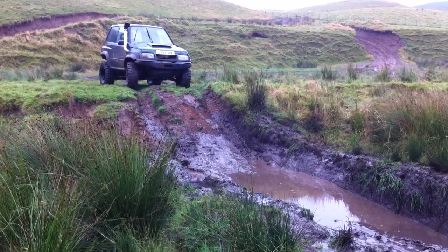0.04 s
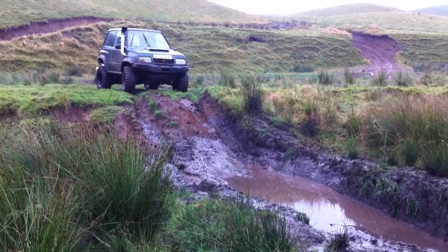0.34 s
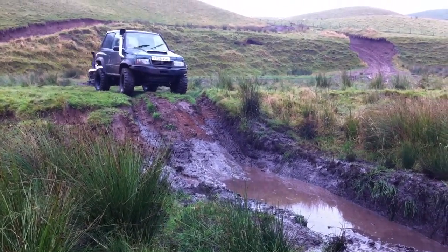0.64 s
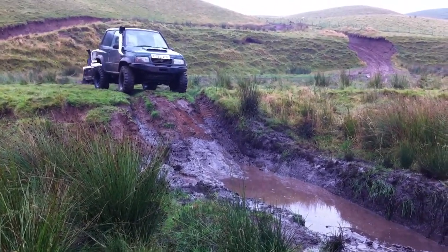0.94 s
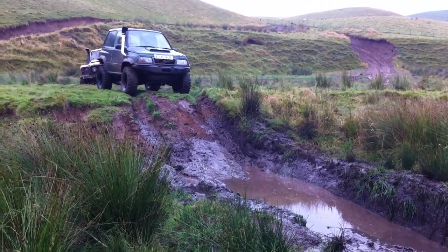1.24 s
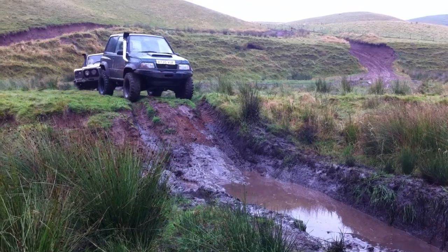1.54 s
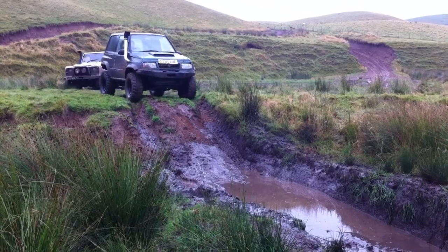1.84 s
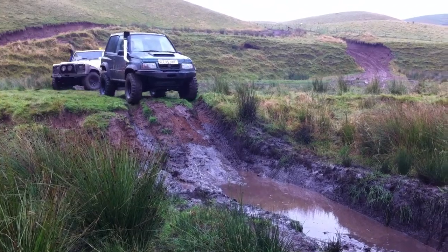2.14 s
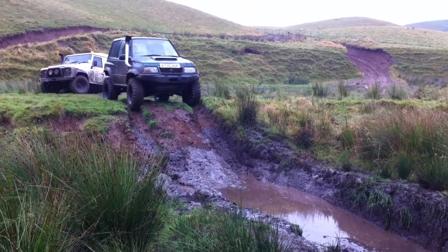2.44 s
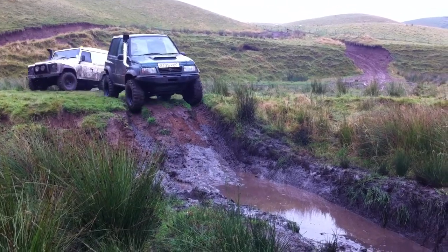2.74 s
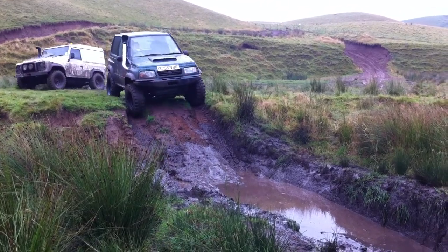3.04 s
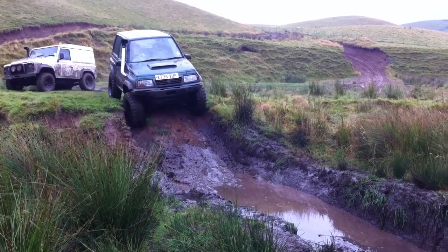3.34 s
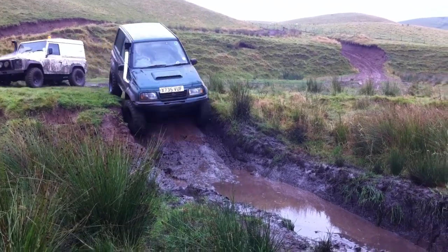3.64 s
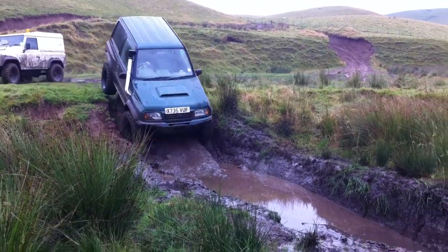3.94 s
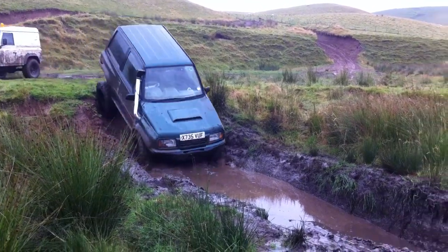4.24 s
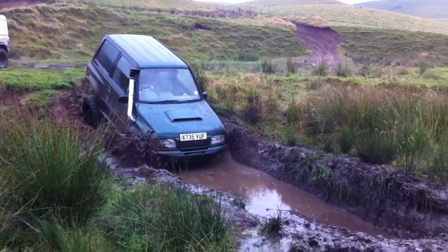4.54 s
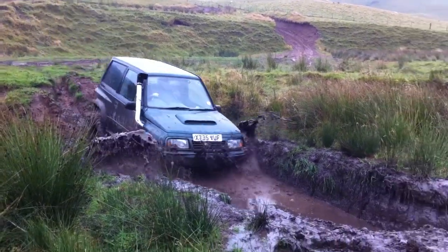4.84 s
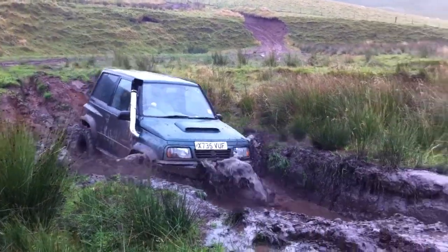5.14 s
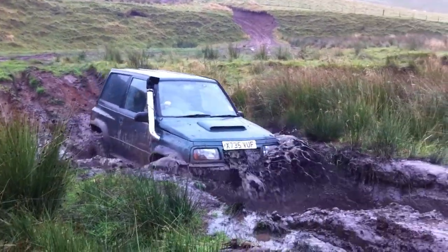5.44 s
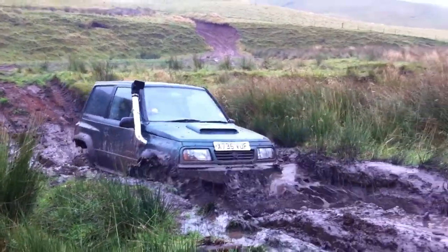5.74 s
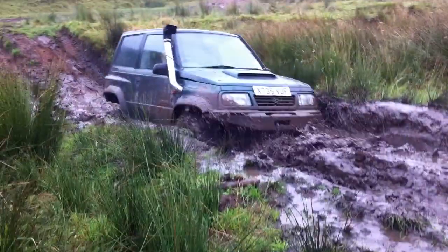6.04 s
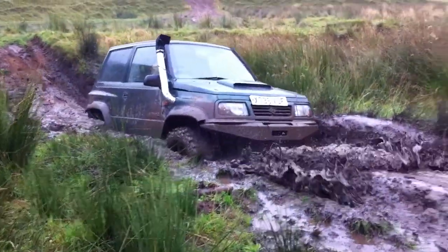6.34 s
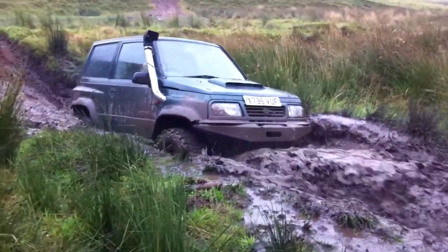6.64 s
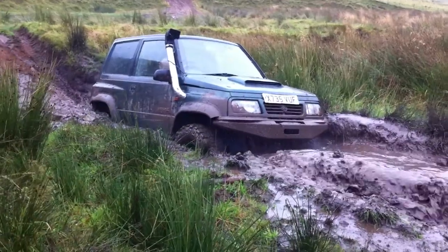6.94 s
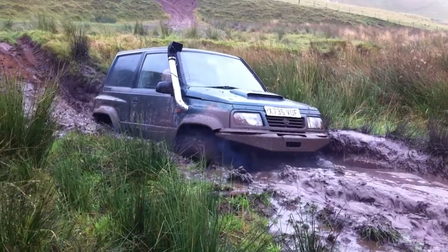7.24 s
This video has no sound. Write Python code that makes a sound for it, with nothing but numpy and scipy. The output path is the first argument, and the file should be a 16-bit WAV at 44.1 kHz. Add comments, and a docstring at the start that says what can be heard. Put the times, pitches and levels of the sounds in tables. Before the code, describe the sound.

On open grassland, a diesel idles close by while an off-road vehicle creeps forward with three light revs, a thin turbo whistle and faint metal clanks. About halfway through, it knocks its underside and drops into a flooded hole. Mud sloshes, gurgles and sprays as the engine surges under load, ending in a loud full-throttle roar. The sound is dry, without echo.

```python
"""A 4x4 through a mud hole

A turbo-diesel creeps over a bank on three dabs of the pedal, drops into a flooded hole, ploughs through and
roars at full throttle, louder with speed, load and nearness. Its firings excite the exhaust, the turbo's blade
tone slides through the intake's resonances, and the wheels churn mud and throw spray. A second diesel idles
close by all along, on open grassland."""
import sys
import numpy as np
from scipy import signal
from scipy.fft import rfft, irfft
from scipy.io import wavfile
from scipy.ndimage import uniform_filter1d, map_coordinates

SR = 44100
rng = np.random.default_rng(int(sys.argv[2]) if len(sys.argv) > 2 else 0)


def wav_record(signal):
    """Record a signal, one row per channel, as 16-bit PCM in the file named by sys.argv[1]."""
    frames = np.transpose(np.atleast_2d(signal))
    bounded = np.clip(frames, -1, 1)
    # unit amplitude maps onto the largest positive 16-bit level
    quanta = np.round(bounded * 32767).astype(np.int16)
    wavfile.write(sys.argv[1], SR, quanta)


N = 331191
TOP_HZ = 15900  # upper band limit


def undb(db):
    """Decibels to amplitude ratio."""
    return 10 ** (np.asarray(db) / 20)


def unit(x):
    """Normalisation to rms 1."""
    return x / np.sqrt(np.mean(x ** 2))


def curves(table):
    """Linear interpolation of each column in time."""
    s, *columns = np.transpose(table)
    return [np.interp(np.arange(N) / SR, s, c) for c in columns]


def ramp(start_s, length_s):
    """A linear rise from 0 to 1, then held."""
    return np.clip((np.arange(N) / SR - start_s) / length_s, 0, 1)


def burst(start_s, attack_s, decay_s):
    """An impact's envelope: quick rise, exponential decay."""
    age = np.maximum(np.arange(N) / SR - start_s, 0)
    return (1 - np.exp(-age / attack_s)) * np.exp(-np.minimum(age / decay_s, 20))


def noise():
    """White Gaussian noise."""
    return rng.standard_normal(N)


def walk(rate_hz):
    """Random modulation: chance levels joined by straight lines; rms 1."""
    hold = int(SR / rate_hz)
    steps = np.repeat(rng.standard_normal(N // hold + 1), hold)
    return unit(uniform_filter1d(steps, hold)[:N])


def colour(x, response, sharp=1, size=8192):
    """Filtering by a body's response; sharp 1 is minimum phase (sudden onset), 0 zero phase; rms 1."""
    hz, db = np.transpose(response)
    log_hz = np.log(np.maximum(np.fft.rfftfreq(size, 1 / SR), 1))
    beyond = np.abs(log_hz - np.clip(log_hz, np.log(hz[0]), np.log(hz[-1])))
    gain = undb(np.interp(log_hz, np.log(hz), db) - 20 * beyond)
    cepstrum = irfft(np.log(gain)) * (1 + sharp * np.sign(np.fft.fftfreq(size)))
    impulse_response = np.roll(irfft(np.exp(rfft(cepstrum))), size // 2)
    return unit(signal.fftconvolve(x, impulse_response, "same"))


def resonate(x, modes):
    """Modal superposition: x drives parallel resonators."""
    return sum(undb(db) * signal.lfilter(*signal.iirpeak(hz, hz / width, fs=SR), x)
               for hz, width, db in modes)


def bend(x, ratio):
    """Time warping scales every frequency by a changing ratio."""
    return map_coordinates(x, [np.cumsum(ratio)], mode="mirror")


def firings(phase, cylinder_db, scatter_db, jitter_s, limp_s=0):
    """A pulse train: cylinders differ in strength, and every second one fires limp_s late."""
    k = np.arange(1, int(phase[-1]))
    chance = rng.standard_normal((len(k), 2))
    s = np.interp(k, phase, np.arange(N) / SR) + limp_s * (k % 2) + jitter_s * chance[:, 0]
    size = undb(np.array(cylinder_db)[k % len(cylinder_db)] + scatter_db * chance[:, 1])
    return np.bincount(np.clip(s * SR, 0, N - 1).astype(int), size, N)


def grains(per_s, spread_db, decay_s):
    """Shot noise: short bursts of random time and size add in power."""
    when, chance = rng.random((int(per_s * N / SR), 2)).T
    size = undb(-spread_db * np.log(np.maximum(chance, .004)))
    impacts = np.bincount((when * N).astype(int), size ** 2, N)
    power = signal.lfilter([1], [1, -np.exp(-1 / (decay_s * SR))], impacts)
    return unit(np.sqrt(power) * noise())


def rings(per_s, low_hz, high_hz, cycles, spread_db, glide=0):
    """Damped oscillations at random times, each rising in pitch by the fraction glide."""
    out = np.zeros(N + SR)
    for when, pitch, size in rng.random((int(per_s * N / SR), 3)):
        hz = low_hz * (high_hz / low_hz) ** pitch
        age = np.linspace(0, 1, int(cycles * SR / hz))
        tone = np.sin(2 * np.pi * cycles * age * (1 + glide * age / 2))
        envelope = np.sqrt(age) * np.exp(-np.log(300) * age)
        out[int(when * N):][:len(age)] += tone * envelope * undb(spread_db * size ** 2)
    return unit(out[:N])


# dabs of the pedal on the bank: deepest_s, half_length_s, depth (0-1)
PEDAL_DABS = [(0.191, 0.4, 0.93), (0.851, 0.49, 0.99), (2.5, .55, .5)]


def pedal(lag_s=0):
    """A trapezoidal envelope: each dab is pressed, held briefly and lifted evenly."""
    t = np.arange(N) / SR - lag_s
    held_share = .2
    return np.max([depth * np.clip((1 - np.abs(t - s) / half_s) / (1 - held_share), 0, 1)
                   for s, half_s, depth in PEDAL_DABS], axis=0)


# modes of block, manifold and bonnet: pitch_hz, width_hz, gain_db
METAL_MODES = [(736, 130, -6), (1420, 78, -12), (2750, 97, 1), (4030, 92, 7)]


def panels(x):
    """Forced vibration: the metal adds its own modes to what drives it; rms 1."""
    return unit(x + resonate(x, METAL_MODES))


# crankshaft speed of the waiting diesel: time_s, turns_hz
IDLE_SPEED = [(0, 19.3), (.6, 17.1), (1.4, 17.3), (2.8, 17.55), (4.3, 17.5)]
# spectra of the idling exhaust and of both engines' knock: frequency_hz, gain_db
IDLE_EXHAUST = [(35, -54), (70, -20.5), (90, -2.5), (122, -17), (145, 5.5), (175, 5.5), (205, -6.5),
                (245, 2), (285, -26.5), (380, -19.5), (460, -47), (900, -46)]
KNOCK_SPECTRUM = [(300, -26.5), (480, -5), (620, 4), (800, 1), (950, -4.5), (1600, -10.5), (2700, -18.5),
                  (3200, -25), (5000, -17.5), (9000, -23.5)]


def idling_diesel():
    """Impulse excitation: thuds, rattle and steady knock, joined by the 4x4's knock at each dab."""
    turns_hz, = curves(IDLE_SPEED)
    phase = np.cumsum(2 * turns_hz) / SR + .688  # two firings a turn
    pulses = firings(phase, cylinder_db=[.031, -.099, .86, -.7], scatter_db=1.2,
                     jitter_s=.00016, limp_s=.0011)
    turbulence = undb(-8) * noise()
    exhaust = colour(unit(pulses) + turbulence, IDLE_EXHAUST, sharp=.3)
    pulsation = 1 + .071 * np.exp(-(phase % 1) / .19)
    knock = panels(colour(pulsation * noise(), KNOCK_SPECTRUM))
    knock_db = -47 + 3.5 * pedal()  # the rise is the 4x4's share
    rattle = rings(per_s=260, low_hz=1900, high_hz=2950, cycles=20, spread_db=7)
    return undb(-30.5) * exhaust + undb(knock_db) * knock + undb(-55.5 + 2 * walk(26)) * rattle


# modes of a loose plate and of the underside: pitch_hz, width_hz, gain_db
PLATE_MODES = [(2250, 90, -2), (2340, 160, 3)]
UNDERSIDE_MODES = [(724, 60, 2), (853, 25, -3), (1360, 120, -14)]
# clanks of the plate: start_s, level_db
PLATE_CLANKS = [(.740, -34.5), (.893, -36), (2.565, -42), (2.949, -39), (3.594, -39), (3.756, -38)]


def chassis():
    """Impacts excite modes: a loose plate chatters, and the underside knocks once on the slope."""
    chatter = sum(undb(db) * burst(s, attack_s=.0029, decay_s=.012) for s, db in PLATE_CLANKS)
    bump = undb(-21) * burst(start_s=4.212, attack_s=.0071, decay_s=.015)
    plate = unit(resonate(noise(), PLATE_MODES))
    underside = unit(resonate(noise(), UNDERSIDE_MODES))
    return chatter * plate + bump * underside


# slaps of mud and spatter, and two low engine thuds: start_s, relative_db, band_hz, decay_s
SLAPS_AND_THUDS = [(3.863, -45, 7000, .009), (4.105, -37, 7500, .002), (4.279, -35, 5000, .004),
                   (4.294, -28.5, 7500, .005), (4.332, -29, 1700, .018), (4.397, -27, 800, .013),
                   (4.628, -30.5, 1400, .03), (4.724, -29.5, 1700, .03), (5.94, -19, 190, .018),
                   (6.338, -22.5, 230, .022), (6.622, -27, 902, .02)]


def slaps_and_thuds():
    """Damped transients of band-limited noise: mud and spatter land; the labouring engine thuds twice."""
    out = np.zeros(N)
    for s, db, hz, decay_s in SLAPS_AND_THUDS:
        band = signal.butter(2, [hz / 1.62, min(hz * 1.2, TOP_HZ)], "bandpass", fs=SR, output="sos")
        hiss = noise()
        transient = signal.sosfilt(band, burst(s, .0011, decay_s) * hiss)
        out += undb(db + 4) * transient / np.std(signal.sosfilt(band, hiss))
    return out


# hiss of tread on wet grass: frequency_hz, gain_db
TYRE_SPECTRUM = [(1500, 13.5), (4000, 3.5), (7000, -4.5), (10500, -3.5), (15500, -12)]


def tyres():
    """Shot noise of the tread: the hiss grows with each dab and on rolling onto the wet slope."""
    level_db = -54 + 5.5 * pedal() + 8.5 * ramp(start_s=1.3, length_s=2.96)
    return undb(level_db) * colour(grains(per_s=2500, spread_db=4, decay_s=.004), TYRE_SPECTRUM)


# churning as the wheels sink in: time_s, level_db
CHURN_LEVEL = [(3.83, -43), (4.02, -40.5), (4.32, -33.5), (4.4, -29), (6.0, -27), (7.5, -28.5)]
# waves thrown up by the wheels: start_s, length_s, mud_gain_db, spray_gain_db
WAVES = [(3.842, 0.08, 0, 5.5), (4.337, 0.065, 0, 4), (5.089, 0.62, 0, 3), (6.567, 0.19, 2.5, 3),
         (7.086, 0.49, 3, 5)]
# spectra of mud and spray: frequency_hz, gain_db
MUD_SPECTRUM = [(60, -35), (200, 9), (370, 1.5), (450, -10.5), (600, 2.5), (780, 3.5), (1200, -5),
                (1550, -3), (2400, -10), (4000, -15), (9000, -21)]
SPRAY_SPECTRUM = [(900, -10.5), (2500, 3.5), (4500, 2.5), (7000, -1), (11500, -1), (15500, -9)]


def mud_and_spray():
    """Cavity resonance: air trapped in churned mud rings, while spray hisses; both swell with waves."""
    attack_s, release_s = .017, .12
    mud_db, = curves(CHURN_LEVEL)
    spray_db = mud_db - 7
    for s, length_s, mud_gain_db, spray_gain_db in WAVES:
        wave = ramp(s, attack_s) * (1 - ramp(s + length_s, release_s))
        mud_db += mud_gain_db * wave
        spray_db += spray_gain_db * wave
    surge = walk(25)
    hollows = 1 + .05 * walk(9)  # they open and close, so their pitch wanders
    slosh = bend(colour(grains(per_s=770, spread_db=.5, decay_s=.013), MUD_SPECTRUM), hollows)
    gulps = rings(per_s=140, low_hz=170, high_hz=950, cycles=10, spread_db=6, glide=.15)
    bubbles = rings(per_s=380, low_hz=753, high_hz=2623, cycles=23.5, spread_db=5, glide=.18)
    mud = undb(.54) * slosh + undb(-10) * gulps + undb(-7.5) * bubbles
    spray = colour(grains(per_s=5400, spread_db=-.5, decay_s=.0011), SPRAY_SPECTRUM)
    in_hole = ramp(CHURN_LEVEL[0][0], attack_s)
    return in_hole * (undb(mud_db + .25 * surge) * mud + undb(spray_db + .61 * surge) * spray)


def full_throttle():
    """A fast transition, 0 to 1, as the floored pedal opens the intake."""
    return ramp(start_s=7.08, length_s=.05)


# the turbo's whistle: time_s, pitch_hz
TURBO_PITCH = [(0, 3840), (.33, 4930), (.6, 5100), (.84, 5520), (.96, 5930), (1.08, 6070), (1.25, 6130),
               (1.55, 5860), (1.75, 5585), (2.05, 5011), (3.15, 5080), (3.35, 4600), (3.7, 4237),
               (4.08, 3950), (4.27, 4250), (4.45, 4970), (4.9, 9220), (5.6, 13530), (6.7, 11610),
               (7.08, 11310), (7.35, 15920)]
# how well the intake lets each pitch out: pitch_hz, level_db
INTAKE_RESPONSE = [(3900, -56), (4200, -54), (4600, -63), (5100, -65), (5420, -63), (5580, -53.5),
                   (5950, -51.5), (6130, -55.5), (9200, -52.5), (11500, -51.5), (15700, -63.5)]


def turbo():
    """Blade-passing tone: a fluttering band in a breathy skirt sweeps the intake's resonances."""
    hz, = curves(TURBO_PITCH)
    near = ramp(start_s=4, length_s=.2)
    dunked = ramp(4.28, .08) - ramp(5.71, .8)  # water round the engine bay muffles it
    climb_hz_per_s = uniform_filter1d(np.gradient(hz) * SR, size=SR // 8)
    driven = np.tanh(climb_hz_per_s / 900)  # louder spooling up than coasting
    level_db = np.interp(hz, *np.transpose(INTAKE_RESPONSE))
    level_db += 6 * near + 7 * full_throttle() - 9 * dunked + 2 * driven
    phase = 2 * np.pi * np.cumsum(hz * (1 + .003 * walk(60))) / SR
    core = walk(340) * np.sin(phase) + walk(340) * np.cos(phase)
    skirt = walk(1100) * np.sin(phase) + walk(1100) * np.cos(phase)
    airy = np.clip(hz / 13000, 0, 1) ** 1.9  # speed tears the tone into hiss
    level_db += (1 - pedal()) * 2 * walk(14)  # the level wavers, least during a dab
    return undb(level_db) * unit(np.sqrt(1 - airy) * core + np.sqrt(airy) * skirt)


# the 4x4's exhaust, chugging and under load: frequency_hz, gain_db
CHUG_RESPONSE = [(35, -40), (70, -42), (105, -1.5), (145, 6), (220, 4.5), (290, -1.5), (395, -14),
                 (450, -25), (700, -16.5), (1500, -54)]
LOADED_RESPONSE = [(65, -27), (110, -6), (148, 5), (175, -1), (202, 5), (238, -6), (266, 3), (300, -10),
                   (365, -13), (402, -5), (445, -30), (600, -25)]


def exhaust_pipe(hz, phase, load):
    """Pipe resonance: uneven firings chug; with load and speed they grow alike, giving clean harmonics."""
    pulses = firings(phase, cylinder_db=[.5, -2.5, -2, -1], scatter_db=2, jitter_s=.00025)
    lumpy = colour(pulses, CHUG_RESPONSE, sharp=.78)
    lumpy /= np.sqrt(uniform_filter1d(lumpy ** 2, SR // 8) + 1e-6)  # steady rms at any speed
    even = np.zeros(N)
    for k in range(1, 9):
        harmonic_db = np.interp(k * hz, *np.transpose(LOADED_RESPONSE)) + 2 * walk(18)
        even += undb(harmonic_db) * np.sin(2 * np.pi * k * phase + k * k)
    chug_hz, fade_hz = 39, 12  # near tick-over it chugs however hard it pulls
    chug = 1 - load * np.clip((hz - chug_hz) / fade_hz, 0, 1)
    return chug * lumpy + np.sqrt(1 - chug ** 2) * unit(even)


# the snorkel's boom: harmonic_number, gain_db
BOOM_HARMONICS = [(1, -16), (2, 2.5), (3, -16.5), (4, -24), (6, -24)]
# its howl at a firing rate of HOWL_FIRING_HZ: pitch_hz, width_hz, gain_db
HOWL_MODES = [(1480, 120, 2.5), (4560, 340, -6.5)]
HOWL_FIRING_HZ = 101.5


def snorkel(hz, phase):
    """A driven air column: it booms at harmonics of the firing rate, and its howl follows the revs."""
    boom = sum(undb(db + .56 * walk(25)) * np.sin(2 * np.pi * k * phase) for k, db in BOOM_HARMONICS)
    howl = bend(resonate(noise(), HOWL_MODES), hz / HOWL_FIRING_HZ)
    return undb(1) * unit(boom) + undb(-19.5) * unit(howl)


# rasp of gas and valves: frequency_hz, gain_db
RASP_SPECTRUM = [(400, -19.5), (550, 4), (700, 5), (950, -8), (1200, -10), (1500, 1), (1900, -18),
                 (3400, -10), (4400, -14), (5600, -13.5), (14000, -16.5)]


def valve_rasp(gas, phase):
    """Broadband excitation: rushing gas and valve ticks, harder at full throttle, ring the metal."""
    ticks = unit(firings(phase, cylinder_db=[2, -4, 0, -2], scatter_db=2, jitter_s=.00005))
    return panels(colour(gas + .49 * (1 + full_throttle()) * ticks, RASP_SPECTRUM))


# engine speed, to which the dabs add: time_s, firing_hz
FIRING_RATE = [(3.95, 35.22), (4.35, 48.62), (4.72, 76.7), (4.9, 73.96), (5.08, 59.5), (5.22, 65.9),
               (5.34, 67.47), (5.5, 54.07), (5.72, 45.96), (5.98, 35.53), (6.4, 35.69), (6.65, 42.9),
               (6.73, 50.15), (6.82, 65.9), (6.93, 76.8), (7.04, 81.87), (7.11, 94.1), (7.25, 105),
               (7.39, 98.2), (7.51, 103.5)]
# drag of the mud on the engine: time_s, load (0-1)
MUD_LOAD = [(4.6, 0.26), (4.88, 1), (5.1, 0.27), (5.32, 0.9), (5.42, 0.61), (5.66, 0.2), (5.85, 0.77),
            (6.35, 0.84), (6.55, 0.35), (6.8, 0.73), (7.05, 0)]
# modes of the engine bay, heard at each dab: pitch_hz, width_hz, gain_db
BAY_MODES = [(559, 36, 4.5), (1085, 59, -5)]


def engine():
    """Periodic combustion: one firing rate drives exhaust, rasp and, at full throttle, the snorkel."""
    hz = curves(FIRING_RATE)[0] + 19.5 * pedal(lag_s=.11)  # the revs lag the pedal
    load, = curves(MUD_LOAD)
    floored = full_throttle()
    dropped = ramp(start_s=4.34, length_s=.14)  # the nose drops in and faces the listener
    octaves_up = np.log2(hz / hz.min())
    level_db = -39.5 + 7 * octaves_up + dropped * (3 + 12 * load) + 14.5 * floored
    phase = np.cumsum(hz * (1 + .006 * walk(30))) / SR
    pipe = exhaust_pipe(hz, phase, load)
    pulsation = 1 + np.exp(-(phase % 1) / .38)
    gas = pulsation * undb(.61 * walk(45)) * noise()
    rasp = valve_rasp(gas, phase)
    cruising = pipe + undb(-19) * rasp
    roaring = snorkel(hz, phase) + undb(-21) * rasp
    bay = undb(-43) * pedal() * unit(resonate(gas, BAY_MODES))
    return undb(level_db) * (np.sqrt(1 - floored) * cruising + np.sqrt(floored) * roaring) + bay


def scene():
    """Superposition: all sources add, alike in both channels."""
    mono = idling_diesel() + chassis() + slaps_and_thuds() + tyres() + mud_and_spray() + turbo() + engine()
    return np.array([mono, mono])


def record(dry):
    """Band limiting: a steep low-pass cuts the top of the treble."""
    return signal.sosfilt(signal.ellip(10, .2, 80, TOP_HZ, fs=SR, output="sos"), dry)


dry = scene()
out = record(dry)
wav_record(out)
```